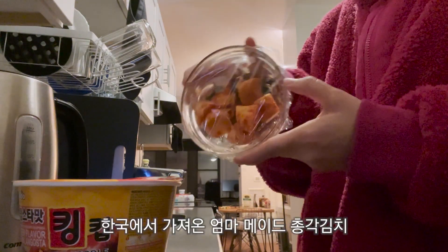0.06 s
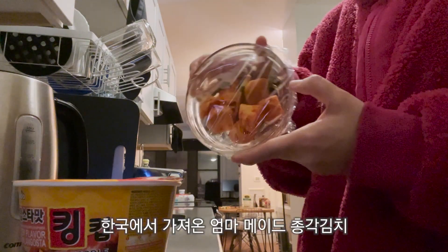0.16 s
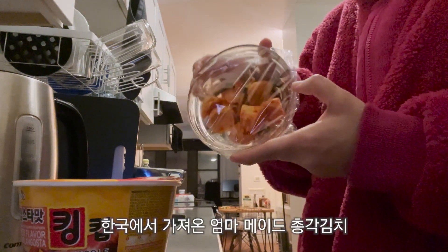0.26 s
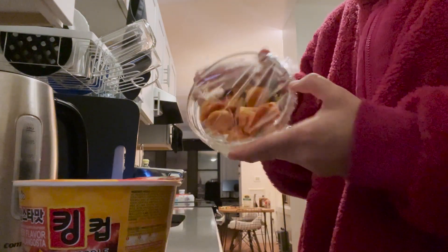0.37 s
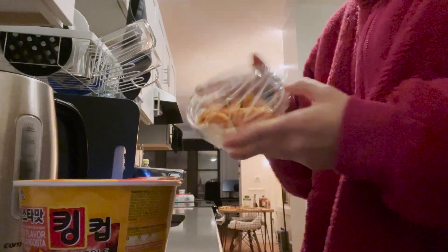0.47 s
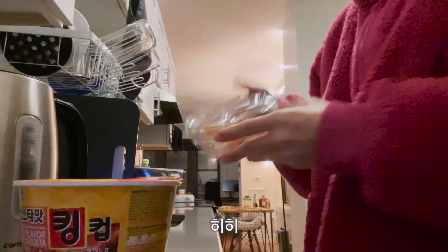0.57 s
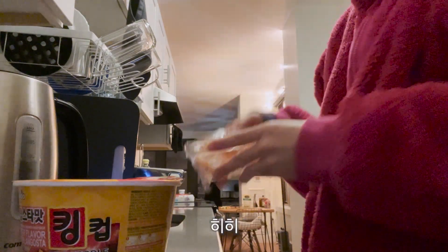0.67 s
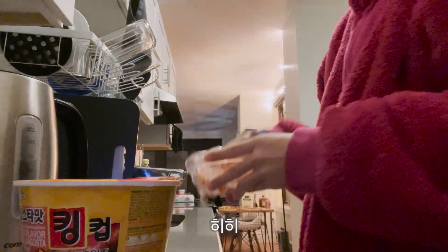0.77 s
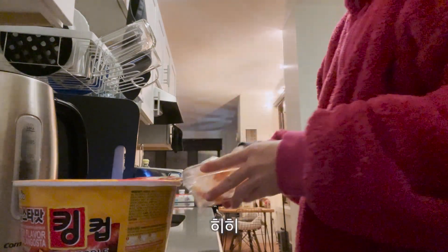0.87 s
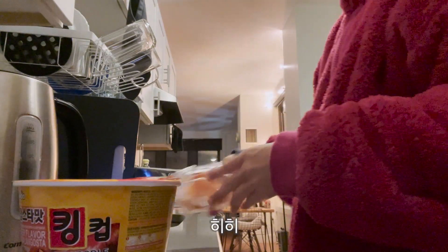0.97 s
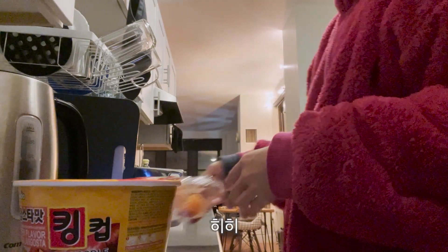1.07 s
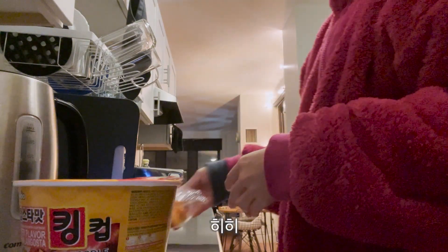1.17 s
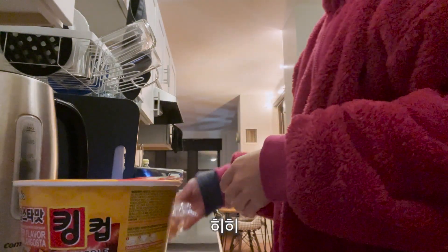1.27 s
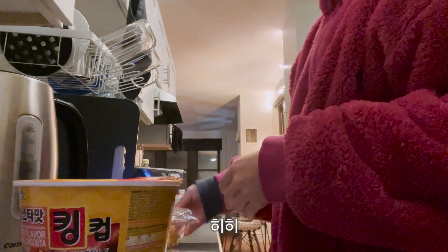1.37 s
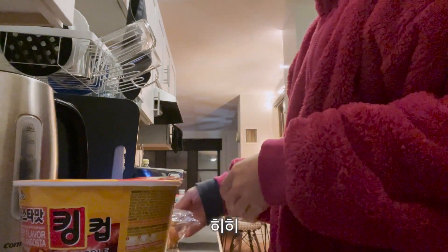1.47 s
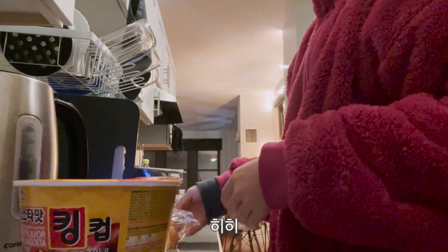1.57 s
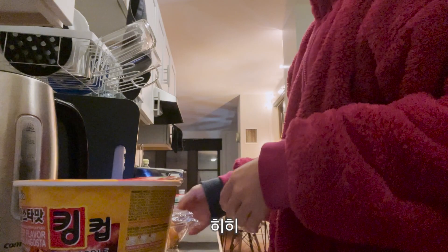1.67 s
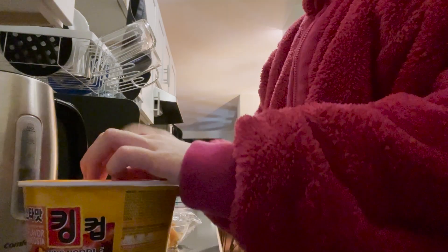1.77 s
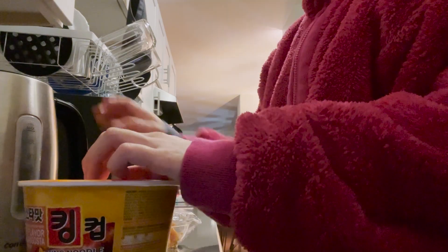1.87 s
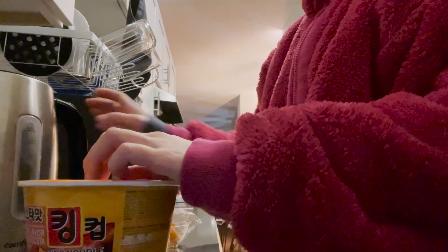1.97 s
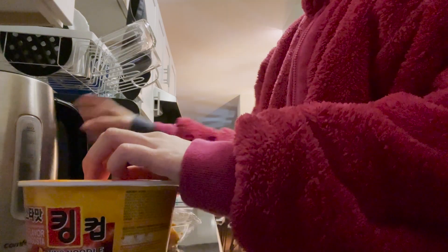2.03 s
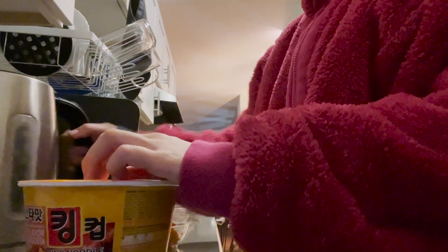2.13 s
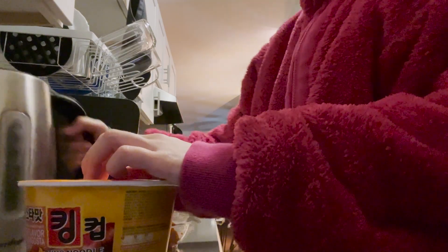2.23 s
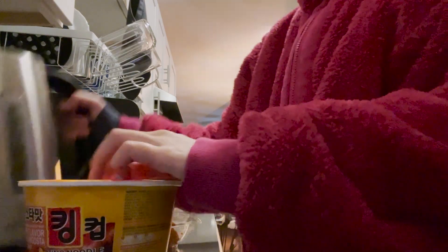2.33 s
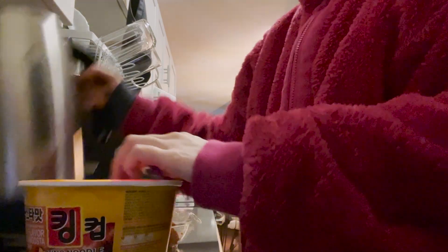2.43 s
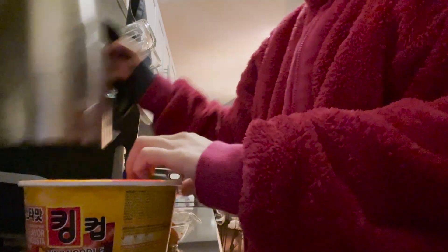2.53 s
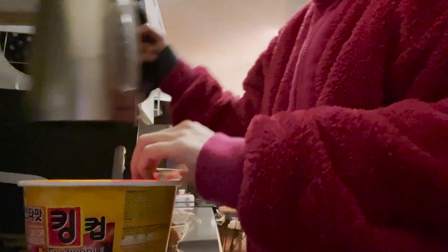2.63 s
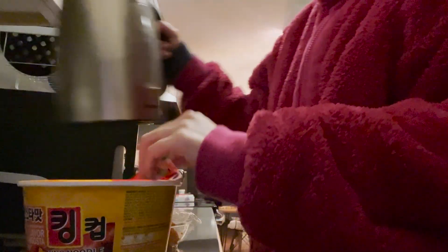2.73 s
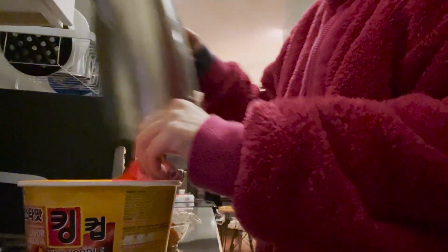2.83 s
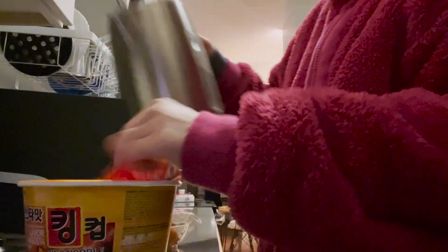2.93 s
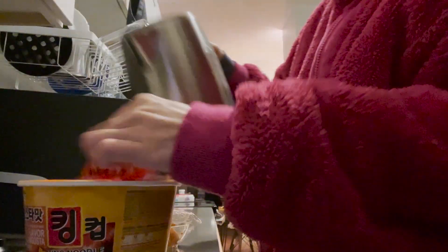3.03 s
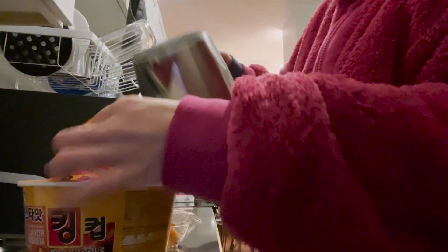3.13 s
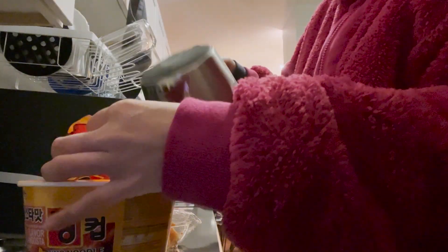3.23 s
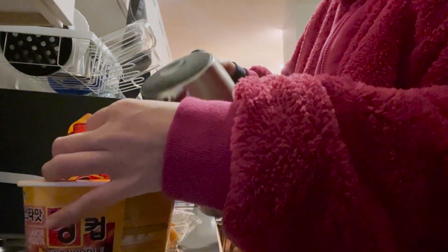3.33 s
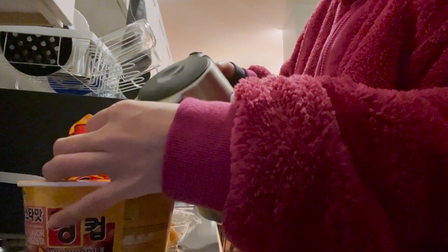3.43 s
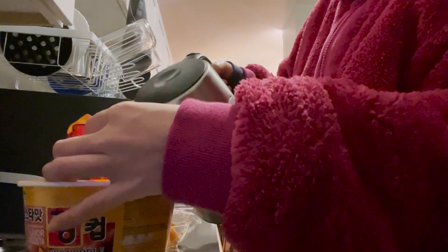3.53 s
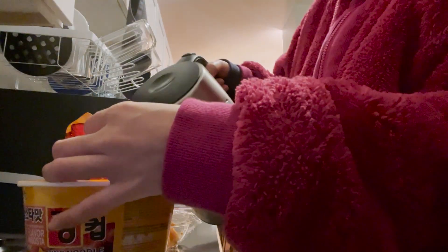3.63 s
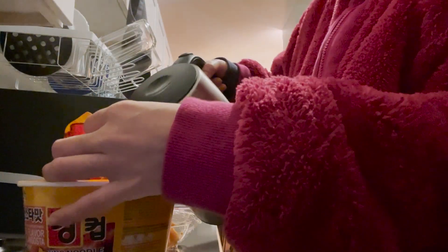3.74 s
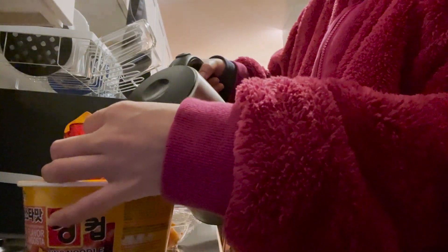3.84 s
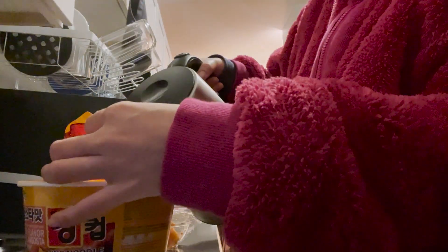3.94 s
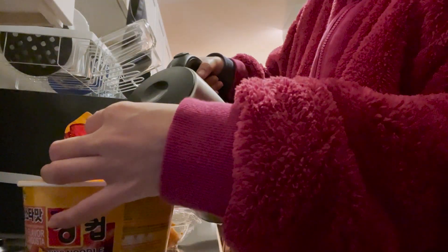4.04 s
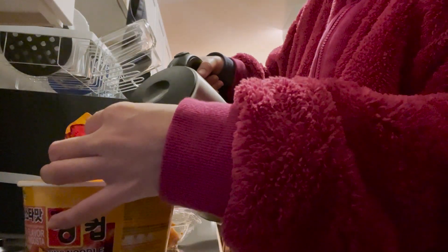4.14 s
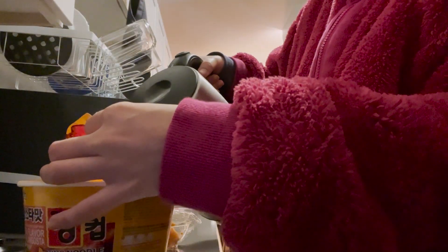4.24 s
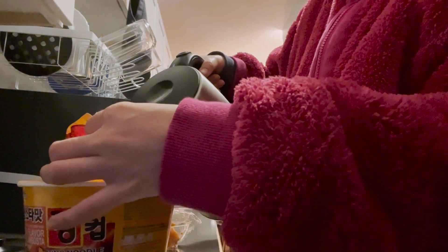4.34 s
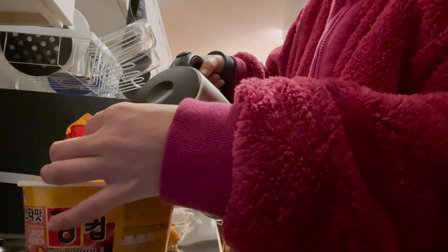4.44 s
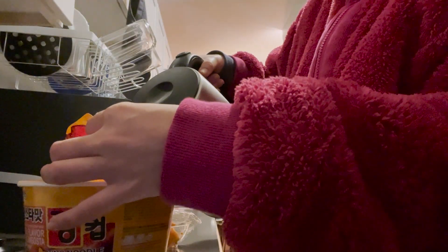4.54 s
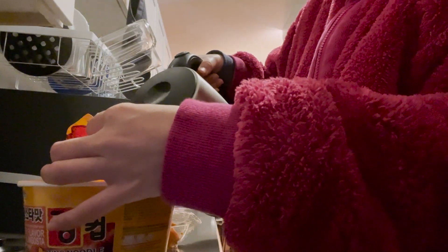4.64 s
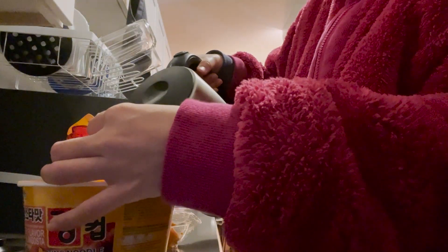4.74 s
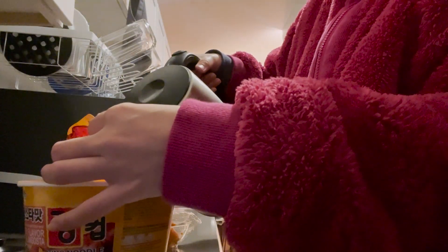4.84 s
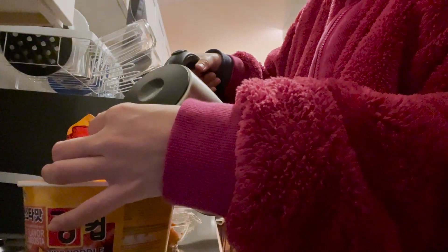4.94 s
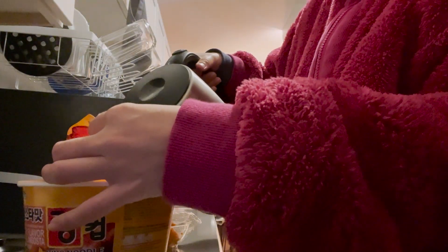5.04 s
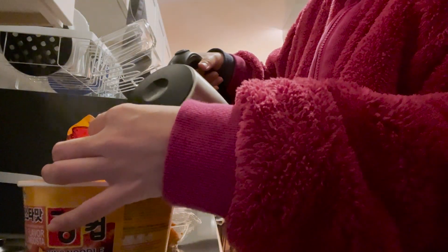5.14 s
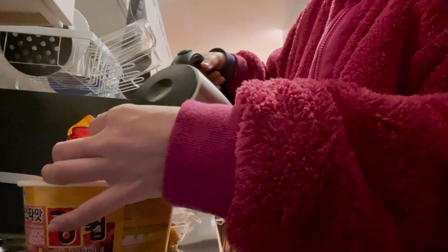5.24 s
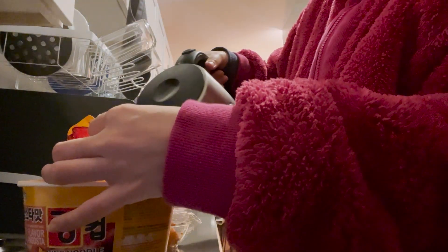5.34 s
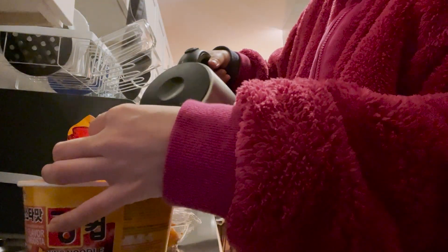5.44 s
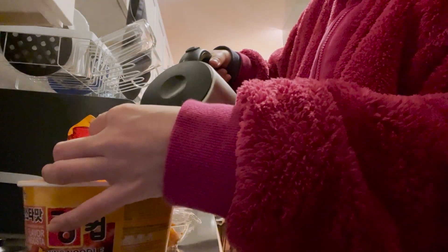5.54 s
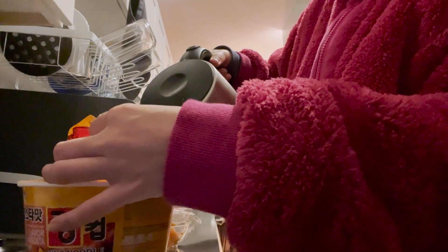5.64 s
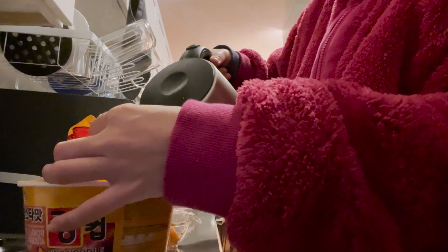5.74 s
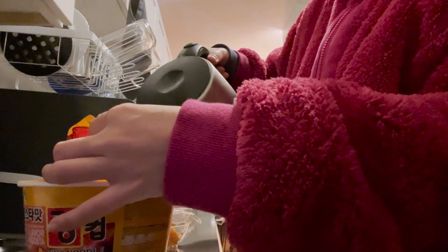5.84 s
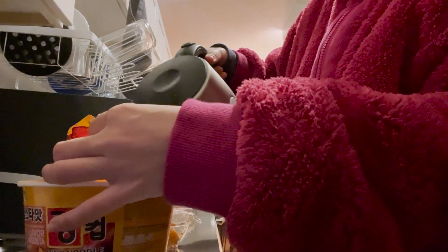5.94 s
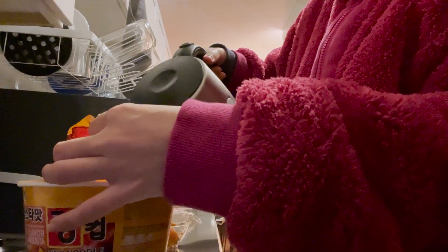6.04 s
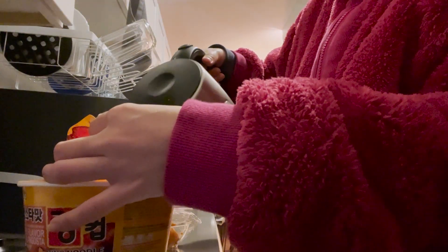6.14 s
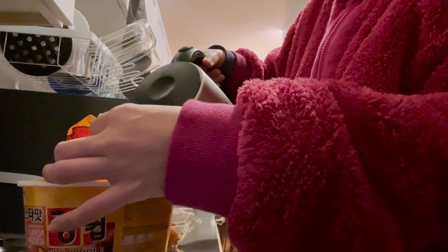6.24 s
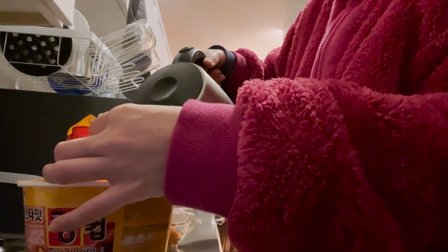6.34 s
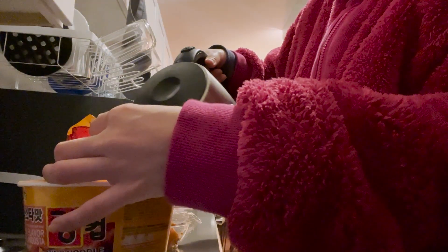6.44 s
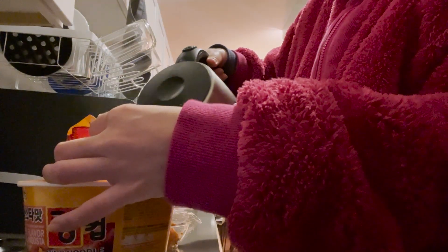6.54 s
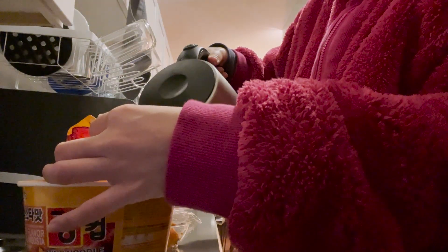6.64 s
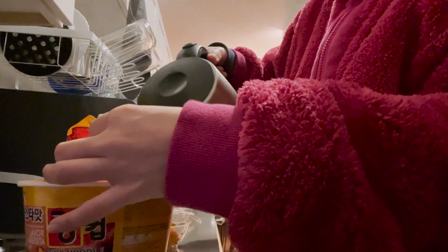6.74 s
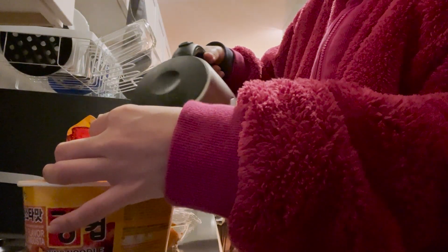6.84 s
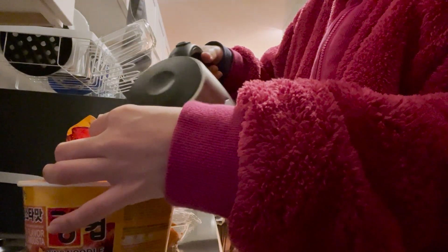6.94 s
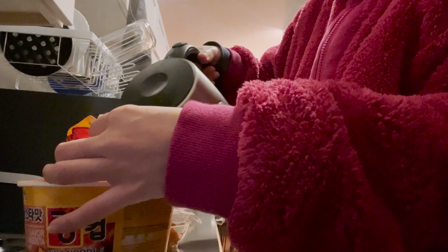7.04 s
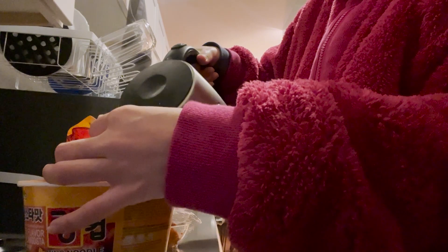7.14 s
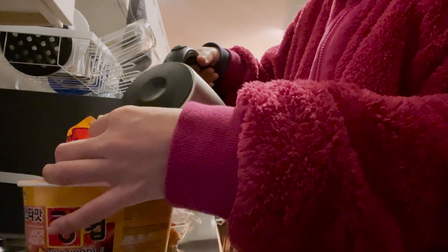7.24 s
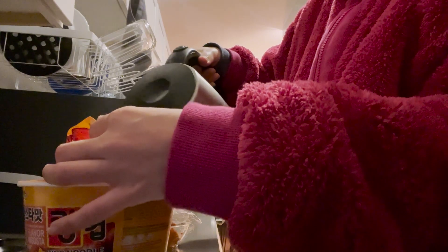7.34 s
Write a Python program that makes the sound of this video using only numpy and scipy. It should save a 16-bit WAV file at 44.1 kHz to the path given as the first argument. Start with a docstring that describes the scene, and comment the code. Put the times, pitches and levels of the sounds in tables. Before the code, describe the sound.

Close to a phone in a small kitchen, a steel kettle boils with a low, uneven rumble and fine fizz. Cling film crackles, and a glass bowl lands hard on the worktop with a quick bounce. The kettle comes off its base with clicks, heavy thumps and a sharp lid clack. Pouring into a paper noodle cup follows: soft low glugs and light drips as the boil dies away.

```python
"""Steel kettle boiled and poured

A steel kettle boils on its base in a kitchen, close to a phone: steam bubbles are noise clicks through metal modes.
A glass bowl under cling film is set down (ringing modes, crackling noise); the kettle is lifted with clicks and
thumps, tipped and poured, and the boil dies down to single glugs (rising sine blips with knocks) and drops (noise
blips). Left and right differ by a phase that varies with frequency; gain control ducks after loud knocks."""
import sys
import numpy as np
from scipy import signal
from scipy.fft import rfft, irfft
from scipy.io import wavfile
from scipy.ndimage import uniform_filter1d

SR = 44100
rng = np.random.default_rng(int(sys.argv[2]) if len(sys.argv) > 2 else 0)


def output_pcm(signal):
    """Save a mono or channel-first signal as 16-bit PCM at the path in sys.argv[1].

    Samples are clipped to [-1, 1] before scaling.
    """
    pcm = np.clip(np.atleast_2d(signal).T, -1, 1) * 32767
    wavfile.write(sys.argv[1], SR, np.round(pcm).astype(np.int16))


N = 326320  # samples, 7.4 s

# how the boil and its fine bubbles swell and die: [t/s, boil level/dB, fine bubble level/dB]
BOIL_LEVELS = [(0.0, -34.5, -51), (0.45, -36.5, -50), (0.82, -35, -49.5), (1.3, -35, -50.5),
               (1.7, -36, -51), (2.06, -40.5, -50), (2.33, -35.5, -47.5), (2.58, -38, -52.5),
               (3.13, -35.5, -53), (3.28, -39, -53.5), (3.4, -35.5, -52.5), (3.65, -42.5, -55),
               (4.3, -46.5, -55.5), (5.05, -47.5, -56), (5.46, -50, -59), (6.43, -51.5, -63),
               (7.05, -50, -65), (7.4, -48.5, -64)]
# modes that steam bubbles ring in the kettle and its base: [f/Hz, width/Hz, first level/dB, second level/dB]
KETTLE_MODES = [(58.5, 40, -17, -6), (81.3, 42, -3.5, -5), (155.7, 23.4, -12.5, -16),
                (209, 59.7, 2.5, -9.5), (299, 43.4, -14.5, -3), (361.5, 59.4, -1.5, -3),
                (430, 50, -5, -9.5), (496.6, 103, -8, -3), (578, 400, -18, -3.5), (787, 94, -21.5, -14.5),
                (880, 60, -21.5, -16), (996, 69, -27, -13), (1101, 65, -29.5, -12.5)]


def amp(db):
    """Decibels to an amplitude factor."""
    return 10 ** (np.asarray(db) / 20)


def evened(x):
    """Scale to an RMS of one."""
    return x / np.sqrt(np.mean(x ** 2) + 1e-20)


def along(rows):
    """Every column of a time curve, sample by sample."""
    s, *columns = np.transpose(rows)
    return [np.interp(np.arange(N) / SR, s, column) for column in columns]


def across(rows, hz):
    """Every column of a spectrum table at the frequencies hz, interpolated over log frequency."""
    f, *columns = np.transpose(rows)
    return [np.interp(np.log(hz + 1), np.log(f + 1), column) for column in columns]


def colour(x, rows):
    """Equalise a sound by a spectrum table in dB."""
    gain_db = across(rows, np.fft.rfftfreq(len(x), 1 / SR))[0]
    return irfft(rfft(x) * amp(gain_db), len(x))


def resonate(x, hz, width):
    """One resonance that passes unit power of white noise."""
    pole = np.exp((2j * np.pi * hz - np.pi * width) / SR)
    return signal.lfilter([np.sqrt(2 - 2 * abs(pole) ** 2)], [1, -pole], x).real


def resonate_twice(x, hz, width):
    """Two equal resonances in a row give steeper skirts."""
    return resonate(resonate(x, hz, width), hz, width)


def slow_noise(*sizes):
    """Random level movement: white noise smoothed over each size in samples, with an RMS of one."""
    x = rng.standard_normal(N)
    for size in sizes:
        x = uniform_filter1d(x, size)
    return evened(x)


def pops(per_s, spread_db, noise_share):
    """Sparse clicks of uneven size over an even hiss."""
    size = amp(spread_db * np.minimum(rng.exponential(1, N), 5)) * rng.choice([-1, 1], N)
    share = np.clip(noise_share, 0, 1)
    sparse = evened(size * (rng.random(N) < per_s / SR))
    return np.sqrt(1 - share) * sparse + np.sqrt(share) * rng.standard_normal(N)


def add(mix, s, sound):
    """Place a sound at s seconds, cut off at the end of the mix."""
    part = mix[round(s * SR):][:len(sound)]
    part += sound[:len(part)]


def crack(hz, t60, width, size=4000):
    """A dying burst of noise through a steep resonance, peak one."""
    x = rng.standard_normal(size) * amp(-60 * np.arange(size) / SR / max(t60, .004))
    for stage in range(3):
        x = resonate(x, hz, 1.15 * width)
    return x / abs(x).max()


def knock(modes, t60):
    """One blow shakes all the broad modes of a damped body."""
    x = sum(amp(db) * crack(hz, t60, width) for hz, width, db in modes)
    return x / abs(x).max()


def struck(modes):
    """One sharp blow sets every mode ringing at once as a dying sine."""
    t = np.arange(4000) / SR
    x = np.zeros(len(t))
    for k, (hz, db, t60) in enumerate(modes):
        x += (-1) ** k * amp(db - 60 * t / t60) * np.sin(2 * np.pi * hz * t)
    return x / abs(x).max()


def body(x, modes):
    """Steep resonances whose strengths move between two sets of levels."""
    # blend from the first set of mode levels to the second: [t/s, blend 0-1]
    blend_curve = [(0, 0), (2.4, 0.36), (2.75, 0.62), (3.5, 0), (3.75, 0.95), (7.4, 0.75)]
    blend, out = np.clip(along(blend_curve)[0], 0, 1), 0
    for k, (hz, width, first_db, second_db) in enumerate(modes):
        steep = evened(resonate_twice(x, hz, 1.33 * width))
        out = out + (-1) ** k * amp(first_db + blend * (second_db - first_db)) * steep
    return out


def room_tone():
    """The quiet kitchen: steady coloured noise, mostly low."""
    # room spectrum: [f/Hz, level per Hz/dB]
    tone_colour = [(20, -30), (40, -9), (60, 5), (100, -12), (200, -11.5), (1000, -45), (4000, -38.5),
                   (9000, -49.5), (16300, -55)]
    level_db = -50.5
    return amp(level_db) * evened(colour(rng.standard_normal(N), tone_colour))


def kitchen(x):
    """Random echoes from the walls, each band dying at its own speed."""
    # decay of the room: [f/Hz, t60/s]
    decay = [(200, 0.29), (1000, 0.36), (1800, 0.62), (2700, 0.9), (5000, 0.47), (12000, 0.67)]
    # what the kitchen walls send back: [f/Hz, level/dB]
    wall_colour = [(300, 5), (900, 6.5), (1500, -2.5), (2300, -2), (3500, -5.5), (8000, -7)]
    hz, t, bands = signal.stft(rng.standard_normal(SR // 2), SR, nperseg=256)
    t60 = across(decay, hz)[0][:, None]
    tail = signal.istft(bands * amp(-60 * t / t60), SR, nperseg=256)[1]
    delayed_tail = np.pad(tail / np.linalg.norm(tail), (400, 0))  # starts 9 ms late
    return signal.fftconvolve(colour(x, wall_colour), delayed_tail)[:N]


def scattered(x):
    """A short dense burst of nearby reflections."""
    taps = rng.standard_normal(1300) * amp(-60 * np.arange(1300) / SR / .03)
    return signal.oaconvolve(x, taps / np.linalg.norm(taps))[:N]


def whistle():
    """A thin high whistle: one sine gliding in pitch and level."""
    # glide of the whistle: [t/s, f/Hz, level/dB]
    glide = [(7.07, 13000, -96), (7.084, 13237, -71), (7.134, 13754, -77), (7.226, 14300, -73),
             (7.258, 13400, -75), (7.314, 13600, -70), (7.352, 12900, -85), (7.4, 12622, -82.5)]
    hz, db = along(glide)
    on = uniform_filter1d(1. * (np.arange(N) / SR > glide[0][0]), 800)  # silent before the glide
    return on * amp(db) * np.sin(2 * np.pi * np.cumsum(hz) / SR)


def rustle():
    """Film and fleece crackle in clumps; each rub swells and fades; stiff film has more top than soft fleece."""
    # film and sleeves in steady slight motion: [t/s, level/dB, top octave against it/dB]
    motion = [(0, -64.5, 0), (0.15, -67.5, 1), (0.6, -59, 2), (1.0, -66, 2), (1.6, -65.5, -8),
              (1.78, -70, -6), (2.2, -62.5, -12), (2.9, -64, -14), (3.4, -70, -24), (3.65, -76, -8),
              (4.2, -69, -20), (5.1, -69, -11), (6.1, -78, 2), (7.4, -77, -2)]
    # single rubs and snaps of film or sleeve: [middle t/s, peak level/dB, half length/s, top octave against it/dB]
    rubs = [(0.682, -57, 0.034, -14), (0.735, -75, 0.0098, -12), (0.917, -54, 0.11, 6.5),
            (1.201, -68, 0.034, 8), (1.291, -62, 0.044, 10), (1.336, -52, 0.032, 14),
            (1.383, -55, 0.028, 8), (1.838, -56.5, 0.035, -13), (2.072, -60, 0.09, 7),
            (2.254, -54, 0.015, -4), (2.302, -45, 0.016, -22), (2.764, -58, 0.071, -5),
            (3.985, -54, 0.077, -12), (4.094, -65.5, 0.13, -4), (5.176, -66, 0.024, -18),
            (5.918, -62, 0.022, -15), (6.14, -60.5, 0.02, -14), (6.76, -73.5, 0.25, -15)]
    # crackle spectrum: [f/Hz, level per Hz/dB]
    film_colour = [(2000, -32), (4500, -4.5), (6500, 0.5), (8000, 5.5), (10000, -0.5), (11500, 2),
                   (13000, -9), (16300, -23)]
    level_db, top_db = along(motion)
    level, top_level, t = amp(level_db), amp(level_db + top_db), np.arange(N) / SR
    for s, db, half, rub_top_db in rubs:
        swell = amp(db) * np.clip(1 - abs(t - s) / half, 0, 1) ** 1.8
        level, top_level = level + swell, top_level + amp(rub_top_db) * swell
    clumps = slow_noise(300)
    crackle = pops(per_s=1600.0, spread_db=3.0, noise_share=0.61)
    top = evened(resonate_twice(crackle, 11000.0, 4100.0))
    return amp(2.75 * clumps) * (level * evened(colour(crackle, film_colour)) + top_level * top)


def clicks():
    """Clicks and slosh knocks: a crack at its own pitch, a knock of broad plastic modes and a bright tick."""
    # clicks of handle, switch and base, with two duller slosh knocks (2.672 s, 3.113 s):
    # [t/s, level/dB, f/Hz, t60/s, tick against it/dB]
    click_events = [(2.056, -36.5, 1900, 0.084, 4.5), (2.1152, -32.5, 1560, 0.054, -22),
                    (2.117, -34, 784, 0.06, -25), (2.1345, -39, 1820, 0.033, -16),
                    (2.221, -35, 1730, 0.029, 0), (2.3028, -19.5, 1920, 0.011, -6),
                    (2.309, -31, 940, 0.052, -22), (2.417, -48, 910, 0.045, -23),
                    (2.672, -44, 880, 0.048, -2), (2.308, -24, 620, 0.06, -21),
                    (2.3183, -40, 2700, 0.046, -1), (2.7425, -26.5, 1690, 0.043, -6.5),
                    (2.746, -22.5, 790, 0.044, -11), (2.771, -45, 2530, 0.042, 6),
                    (2.949, -57, 2110, 0.033, -17), (2.978, -61, 2150, 0.018, -19),
                    (3.095, -50.5, 2600, 0.036, 9.5), (3.113, -39.5, 1050, 0.045, -17)]
    # modes of the plastic: [f/Hz, width/Hz, level/dB]
    plastic_modes = [(600, 200, 4), (900, 300, 5), (1600, 500, -2), (2100, 350, 0), (2600, 500, -4),
                     (4300, 1200, -12)]
    out = np.zeros(N)
    for s, db, hz, t60, tick_db in click_events:
        snap = crack(hz, t60, 900.) + knock(plastic_modes, t60) + crack(1600., .01, 1800.)
        tick = amp(tick_db) * crack(3640.0, 0.031, 3600.0)
        add(out, s, amp(db) * (snap + tick))
    return out


def lid():
    """The lid knocks as the kettle swings: a hard clack of struck modes with a short noise rattle."""
    # the one clack: [t/s, level/dB]
    clack = (2.9172, -11)
    # modes of the lid: [f/Hz, level/dB, t60/s]
    lid_modes = [(565, -4, .1), (759, -13, 0.08), (1000, 4, 0.025), (1310, 2, 0.011), (1580, -1, 0.015),
                 (1785, -8, 0.04), (2060, -4, 0.03), (2270, -4, 0.028), (2690, -7, 0.022),
                 (3290, -24, 0.03), (4200, -12, 0.012), (5900, -16, 0.012)]
    out, (s, db) = np.zeros(N), clack
    rattle = amp(-12) * crack(2050., 0.14, 900.0)
    add(out, s, amp(db) * (struck(lid_modes) + rattle))
    return out


def bowl():
    """Glass on the worktop: faint rising noise, then a sharp blow, a ring, a rattle and a low thud just after."""
    # the bowl lands and bounces: [t/s, blow/dB, ring/dB, thud/dB, rattle/dB]
    landings = [(1.3326, 0, -8, 0, -15), (1.3799, -3.5, -18, -12, -13), (1.3945, -15, -24, -22, -14)]
    # the dead knock of the worktop: [f/Hz, level/dB, t60/s]
    worktop_modes = [(604, -8, 0.011), (824, -1.5, 0.024), (1160, 4, 0.0064), (1590, 3, 0.011),
                     (1800, -3.5, 0.013), (2580, -5.5, 0.019), (3260, -24, .01), (4200, -28, .008),
                     (7780, -33, 0.012)]
    # what the glass rings on with: [f/Hz, level/dB, t60/s]
    glass_modes = [(519, -19, 0.048), (810, -7, 0.056), (940, -12, 0.15), (970, -15, 0.05),
                   (1197, -3.5, 0.055), (1290, -33, 0.05), (1380, -12, 0.016), (1746, -16, 0.069),
                   (1860, -16, 0.072), (2170, -21, 0.12), (2410, -14, 0.06), (2605, -11, 0.055),
                   (3200, -26, 0.11), (3100, -34, .06), (3680, -18, 0.065), (4160, -25, 0.055),
                   (4560, -19, 0.035)]
    out, t = np.zeros(N), np.arange(3000) / SR
    rising_noise = crack(3000.0, 1.5, 2600.0, size=800) * np.linspace(0, 1, 800) ** 2
    add(out, landings[0][0] - 800 / SR, amp(-14.0) * rising_noise)  # faint noise rising before the blow
    for s, blow_db, ring_db, thud_db, rattle_db in landings:
        rattle = crack(1700.0, 0.2, 2400.0) + .6 * crack(750., .1, 800.)
        blow, ring = amp(blow_db) * struck(worktop_modes), amp(ring_db) * struck(glass_modes)
        add(out, s, blow + ring + amp(rattle_db) * rattle)
        thud = amp(thud_db - 60 * t / 0.0088) * np.sin(2 * np.pi * 370.0 * t)
        add(out, s + 0.00419, thud)
    return out


def drops():
    """A drop landing in the cup is a short noise blip at its own pitch with a spray of treble."""
    # drops landing in the cup: [t/s, level/dB, f/Hz, treble against it/dB]
    cup_drops = [(3.4745, -40.5, 1570, -5), (3.497, -43, 1390, 5), (3.7237, -55, 1430, 5.5),
                 (3.8367, -50, 1400, 7.5), (3.9887, -41.5, 2530, 7), (4.021, -48, 1420, 7),
                 (4.188, -56, 1410, 8), (4.3237, -57, 1610, 4), (4.5098, -58, 1590, -4),
                 (4.6858, -43, 1530, -18), (4.9877, -62, 1560, 10), (5.0476, -48, 1240, 0),
                 (5.1158, -39, 3570, -2), (5.2526, -54, 1460, -10), (5.4958, -43.5, 2600, 4),
                 (5.6487, -52, 2810, 2), (5.8094, -52.5, 2830, -8), (5.8445, -55, 1910, 8),
                 (5.916, -57.5, 4370, 13.5), (6.0428, -54.5, 1350, 6), (6.227, -60, 1800, 12),
                 (6.412, -53.5, 2900, -7), (6.6335, -53, 1280, 8), (6.6953, -58, 1940, 9),
                 (6.712, -52, 1900, 2), (6.7318, -57, 1850, -10), (6.77, -50, 1870, 2),
                 (6.8166, -55.5, 2800, 8.5), (6.88, -57, 3500, 3), (6.9388, -56.5, 2900, 5),
                 (6.9717, -53.5, 3480, 5), (7.022, -64, 3000, -5), (7.282, -66, 1300, -1),
                 (7.3818, -51, 3320, 1)]
    # lowest and highest of faint random drops while pouring: [t/s, level/dB, f/Hz, treble against it/dB]
    faint_range = [(3.4, -68.5, 1180, -4), (7.4, -59, 4400, 12.5)]
    blip_t60 = 0.044  # seconds
    out = np.zeros(N)
    for s, db, hz, spray_db in [*cup_drops, *rng.uniform(*faint_range, size=(220, 4))]:
        spray = amp(spray_db) * crack(3800.0, 0.067, 6600.0)
        add(out, s, amp(db) * (crack(hz, blip_t60, 450.0) + spray))
    return out


def gurgle():
    """Soft uneven bubbles come in clumps and keep a few wall modes pulsing while the water pours."""
    # wall modes that the emptying water sets pulsing: [f/Hz, width/Hz, full level/dB, emptier level/dB]
    pulsing_modes = [(780, 44, -4, 11), (900, 210, -8.5, -17), (1104, 74, 1, 3)]
    # overall gurgle: [t/s, level/dB]
    gurgle_curve = [(0, -90), (3.3, -61), (3.6, -63.5), (5.3, -63), (6.3, -65.5), (7.4, -66)]
    clumps = slow_noise(1500, 1500)
    bubbles = amp(4.0 * clumps) * pops(per_s=120., spread_db=2.5, noise_share=0.3)
    emptied = np.clip((np.arange(N) / SR - 5.0) / 2.4, 0, 1)  # 0 until 5 s, 1 at the end
    ring = np.zeros(N)
    for hz, width, full_db, low_db in pulsing_modes:
        ring += amp(full_db + emptied * (low_db - full_db)) * evened(resonate_twice(bubbles, hz, width))
    return amp(along(gurgle_curve)[0]) * ring


def simmer():
    """Dense tiny bubbles flicker together and ping the wall; the stream stirs the air space of the cup."""
    # fine bubble spectrum: [f/Hz, level per Hz/dB]
    fizz_colour = [(300, -0.5), (900, 5.5), (1400, -1.5), (1900, -6.5), (2600, -3), (3300, -2),
                   (4000, -5.5), (5000, -9), (6500, -15), (9000, -24), (16000, -24)]
    # thin wall modes that the fine bubbles ring: [f/Hz, width/Hz, first level/dB, second level/dB]
    wall_modes = [(1938, 240, -7.5, -11), (2624, 72, -9, -10), (2853, 76, -12, -7), (3480, 89, -18, -6.5),
                  (4430, 320, -15, -8)]
    # water moving in the kettle as it is lifted, then the stream into the cup: [t/s, level/dB]
    stream_curve = [(0, -88), (2.25, -90), (2.41, -58), (2.75, -58), (2.9, -66), (3.05, -78), (3.3, -95),
                    (3.5, -52), (3.67, -64), (4.05, -64), (4.13, -76), (4.25, -57), (4.55, -62), (4.8, -66),
                    (4.95, -61), (5.15, -62), (5.32, -78), (5.7, -65), (6.5, -98), (7.4, -89)]
    # single bubbles strike one thin wall mode: [t/s, level/dB]
    ping_events = [(0.105, -42), (0.235, -49), (0.794, -42), (0.978, -44)]
    fizz_db, cup_db = along(BOIL_LEVELS)[1], along(stream_curve)[0]
    flicker = slow_noise(700)
    bubbles = pops(per_s=1500., spread_db=3.0, noise_share=0.59)
    pings = body(pops(per_s=300., spread_db=1.0, noise_share=0.11), wall_modes)
    stirred = amp(3.0 * slow_noise(1400)) * bubbles
    cup_modes = [(720., 350.0), (1000., 610.0), (1480., 430.0)]  # [f/Hz, width/Hz]
    cup = evened(sum(resonate_twice(stirred, hz, width) for hz, width in cup_modes))
    fizz = evened(colour(bubbles, fizz_colour)) + amp(-6.5) * pings
    out = amp(0.89 * flicker) * (amp(fizz_db) * fizz + amp(cup_db) * cup)
    for s, db in ping_events:
        add(out, s, amp(db) * crack(wall_modes[1][0], 0.076, 130.0))
    return out


def glugs():
    """Thumps and glugs: a dying sine rising in pitch, with knocks of the belly and upper wall and a splash."""
    # kettle thumps (2.307 s, 2.722 s, 2.7435 s), larger bubbles and sloshes:
    # [t/s, level/dB, starting f/Hz, t60/s, wall knock/dB]
    thumps_and_glugs = [(2, -19, 217, 0.093, -50), (2.178, -20.5, 316, 0.085, -56),
                        (2.275, -21, 242, 0.073, -51), (2.307, -12, 383, 0.04, -27),
                        (2.362, -22, 216, 0.055, -40), (2.419, -17, 537, 0.05, -36),
                        (2.635, -25.5, 203, 0.094, -50), (2.722, -16, 366, 0.035, -40),
                        (2.7435, -9, 330, 0.03, -30), (2.7495, -11, 520, 0.03, -33),
                        (2.757, -14, 322, 0.03, -38), (2.776, -20, 340, 0.09, -40),
                        (2.843, -24, 299, 0.1, -46), (2.927, -22.5, 336, 0.073, -40),
                        (3.245, -29.5, 296, 0.3, -50), (3.432, -31.5, 270, .4, -50),
                        (3.56, -29.5, 294, 0.18, -50), (3.727, -32, 369, 0.22, -31),
                        (3.933, -27.5, 353, 0.088, -47), (4.516, -31.5, 320, 0.23, -52),
                        (4.763, -31, 320, 0.035, -60), (4.929, -29, 403, 0.095, -47),
                        (4.987, -52.5, 400, 0.052, -38), (5.135, -33, 295, 0.16, -49),
                        (5.253, -41.5, 389, 0.22, -42), (5.497, -32, 395, 0.072, -47),
                        (5.753, -32.5, 362, 0.057, -49), (6.033, -32, 430, 0.042, -50),
                        (6.171, -37.5, 291, 0.057, -54), (6.237, -35.5, 350, 0.036, -50),
                        (6.414, -33, 303, 0.04, -45), (6.572, -38.5, 292, 0.3, -52),
                        (6.759, -33.5, 373, 0.048, -51), (7.02, -36.5, 295, 0.14, -51),
                        (7.283, -34, 279, 0.1, -44)]
    # lowest and highest of small random glugs while pouring: [t/s, level/dB, starting f/Hz, t60/s, wall knock/dB]
    small_range = [(3.7, -50, 275, 0.081, -62), (7.4, -37, 420, 0.18, -53)]
    splash_db = -5.5  # treble splash against the wall knock
    out, t = np.zeros(N), np.arange(4000) / SR
    modes = [(hz, width, second_db) for hz, width, first_db, second_db in KETTLE_MODES]
    belly, upper_wall = modes[4:9], modes[9:]
    small = rng.uniform(*small_range, size=(44, 5))
    for s, db, hz, t60, wall_db in [*thumps_and_glugs, *small]:
        envelope = (1 - np.exp(-t / 0.00059)) * amp(-60 * t / t60)
        tone = envelope * np.sin(2 * np.pi * hz * t * (1 + 0.81 * t))
        add(out, s, amp(db) * (tone + amp(-3.5) * knock(belly, 0.018)))
        splash = amp(splash_db) * crack(2600.0, 0.036, 5500.0)
        add(out, s, amp(wall_db) * (knock(upper_wall, 0.0062) + splash))
    return out


def boil():
    """Collapsing steam bubbles knock the kettle; the two lowest modes fade slowly after the lift."""
    # gain of the two lowest modes: [t/s, gain/dB]
    low_gain = [(0, 0), (2.45, 4), (2.6, -1), (7.4, -15)]
    rumble = body(pops(per_s=260., spread_db=3.5, noise_share=0.55), KETTLE_MODES)
    low = np.zeros(N)
    for hz, width, first_db, second_db in KETTLE_MODES[:2]:
        low += np.sqrt(np.pi * width / SR) * resonate(rumble, hz, 2 * width)
    return amp(along(BOIL_LEVELS)[0]) * (rumble - (1 - amp(along(low_gain)[0])) * low)


def steady(surge):
    """All that hisses or rumbles, drawn afresh each call; boil and simmer follow the given surges of the water."""
    water = amp(1.03 * surge) * boil() + amp(1.5 * surge) * simmer()
    return water + gurgle() + rustle() + room_tone()


def scene():
    """Channel 0 reaches left and right; channel 1, for the right only, is diffuse sound and some near sounds."""
    hits = bowl() + clicks() + lid() + drops()
    single = hits + glugs() + whistle()
    echo = [amp(-12.5) * kitchen(hits) for channel in range(2)]
    surge = slow_noise(600, 600)
    direct = single + echo[0] + steady(surge)
    diffuse = amp(-14) * single + amp(-3) * scattered(single) + echo[1] + steady(surge)
    return np.array([direct, diffuse])


def record(dry):
    """Left and right differ by a phase that varies with frequency; then ducking, soft saturation, band limit."""
    # left against right: [f/Hz, left lead/rad, likeness 0-1, left minus right/dB]
    stereo_table = [(70, .08, .99, -2), (140, .15, .95, -1), (300, .12, .96, -3), (400, .7, .9, -2),
                    (500, 1.2, .8, 0), (630, 2.7, .86, -2), (820, 2.5, .5, -4), (1070, 1.8, .7, 1.5),
                    (1400, .8, .7, 3.5), (2400, -1.2, .4, 0), (3200, -1.7, .45, -1), (5000, -1., .3, -1),
                    (7000, 0., .8, -1), (9000, 1.4, .85, 0), (10000, 2.4, .93, 0), (10500, 3.06, 1, 0),
                    (11700, 3.22, 1, 0), (12300, 4, .9, 0), (13200, 5.2, .8, 0), (14500, 6.28, .99, 0)]
    edge_hz = 15950
    lead, same, tilt_db = across(stereo_table, np.fft.rfftfreq(N, 1 / SR))
    same, (direct, diffuse) = np.clip(same, 0, 1), rfft(dry)
    left = direct * np.exp(.5j * lead) * amp(tilt_db / 2)
    right = (same * direct + np.sqrt(1 - same ** 2) * diffuse) * np.exp(-.5j * lead) / amp(tilt_db / 2)
    pair = irfft(np.array([left, right]), N)
    # the origins make both averages look back in time only
    power = abs(uniform_filter1d((pair ** 2).mean(0), 600, origin=299))
    power_db = 10 * np.log10(power + 1e-12)
    fall = np.arange(N) * 60. / SR  # the held level falls 60 dB a second
    held_db = np.maximum.accumulate(power_db + fall) - fall
    over_db = np.maximum(held_db + 20.5, 0)  # above a threshold of -20.5 dB
    duck_db = 0.64 * uniform_filter1d(over_db, size=4000, origin=1999)  # takes hold over 90 ms
    ducked = pair / amp(duck_db)
    rounded = .95 * np.tanh(ducked / .95)  # rounds off the loudest peaks
    low_pass = signal.firwin(511, edge_hz, window=("kaiser", 9), fs=SR)
    return signal.oaconvolve(rounded, low_pass[None], "same")


dry = scene()
out = record(dry)
output_pcm(out)
```